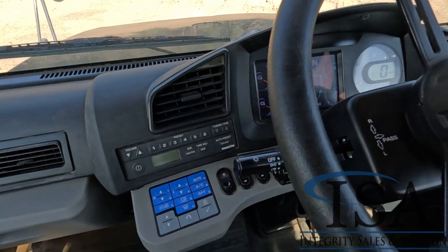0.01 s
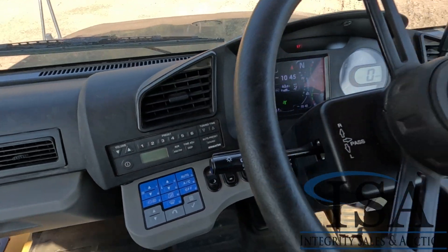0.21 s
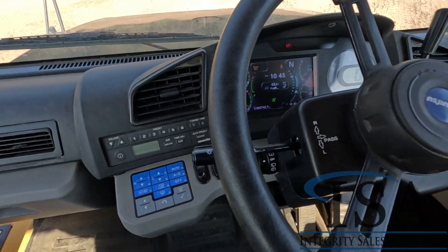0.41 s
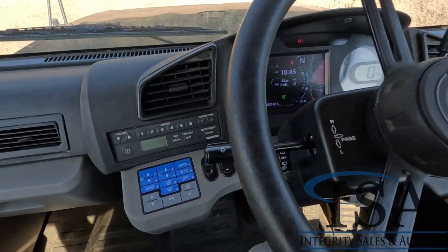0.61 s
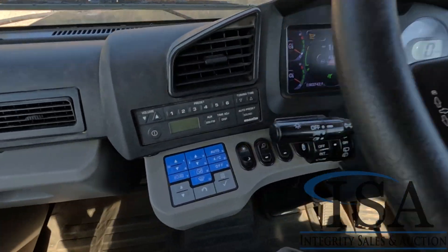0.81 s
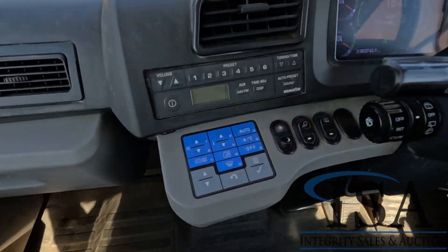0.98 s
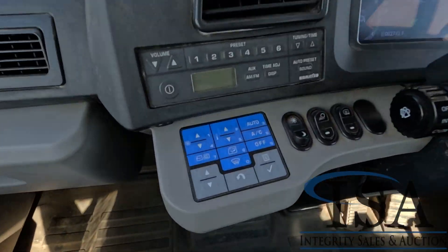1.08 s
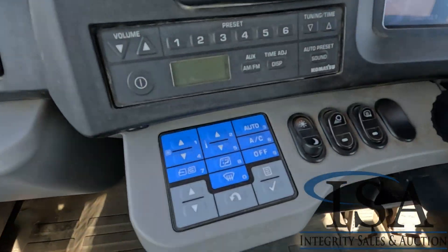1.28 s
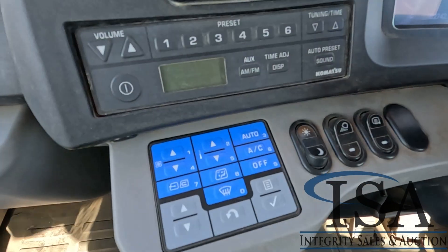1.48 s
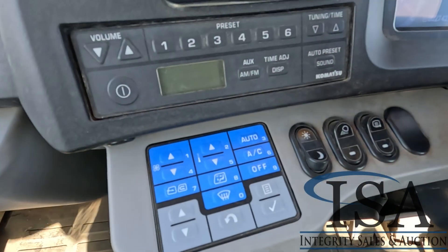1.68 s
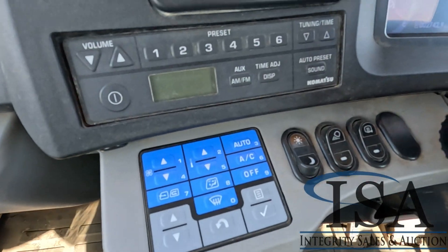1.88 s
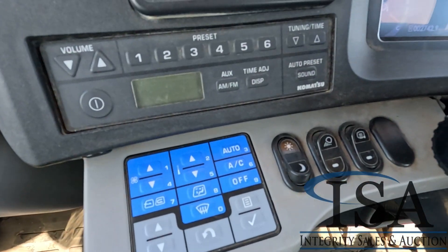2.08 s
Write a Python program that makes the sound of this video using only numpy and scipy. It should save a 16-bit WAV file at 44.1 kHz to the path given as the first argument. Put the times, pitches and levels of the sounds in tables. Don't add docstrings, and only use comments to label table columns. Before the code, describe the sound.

A heavy cab door slams at about 0.65 seconds, heard close inside a large idling diesel vehicle. Before it, engine clatter enters through the doorway. Air pressure thumps, the latch bangs, and metal panels crash and rattle until about 0.9. The engine drops to muffled low rumble with blower hum and vent hiss, while fingers knock and creak on the microphone, right side, with a faint squeak near 1.2.

```python
import sys
import numpy as np
from scipy import signal
from scipy.io import wavfile
from scipy.ndimage import uniform_filter1d

SR = 44100
rng = np.random.default_rng(int(sys.argv[2]) if len(sys.argv) > 2 else 0)


def log_audio(samples):
    frames = np.atleast_2d(samples).T
    limited = np.clip(frames, -1, 1)
    pcm = np.round(limited * 32767).astype(np.int16)
    wavfile.write(sys.argv[1], SR, pcm)


def ratio_of_db(decibels):
    return 10 ** (np.asarray(decibels, float) / 20)


N = 94815
SHUT_S = 0.654


def evened(x):
    return x / np.sqrt(np.mean(x ** 2) + 1e-20)


def read(points, hz):
    f, value = np.transpose(points)
    return np.interp(np.log(hz + 1), np.log(f + 1), value)


def curve(points):
    s, db = np.transpose(points)
    return ratio_of_db(np.interp(np.arange(N) / SR, s, db))


def left_right(left_db, right_db):
    return ratio_of_db(np.array([[left_db], [right_db]]))


def add(mix, s, sound):
    part = mix[..., round(s * SR):][..., :sound.shape[-1]]
    part += sound[..., :part.shape[-1]]


def noise(tone, same, lean, patchy_db, size=1024, pipes=()):
    hop = size // 4
    hz = np.fft.rfftfreq(size, 1 / SR)
    a, b, c, d, patch = rng.standard_normal((N // hop + 5, len(hz), 5)).T
    patch = uniform_filter1d(uniform_filter1d(patch, size=8, axis=0), size=8, axis=1)
    like = np.clip(read(same, hz), -1, 1)[:, None]
    left = a + 1j * b
    right = like * left + np.sqrt(1 - like ** 2) * (c + 1j * d)
    side = read(lean, hz)[:, None] / 2
    resonance = sum(db * np.exp(-((hz - f) / width) ** 2) for f, width, db in pipes)
    colour_db = (read(tone, hz) + resonance)[:, None] + patchy_db * evened(patch)
    z = np.array([left, right]) * ratio_of_db(colour_db + np.array([side, -side]))
    return evened(signal.istft(z, nperseg=size, noverlap=size - hop)[1][:, :N])


def bursts(rows):
    out = np.zeros(N)
    for s, db, rise, t60 in rows:
        t = np.arange(0, rise + 1.5 * t60, 1 / SR)
        fall_db = 60 * np.maximum(t - rise, 0) / t60
        add(out, s, np.minimum(t / rise, 1) * ratio_of_db(db - fall_db))
    return out


def ring(db, hz, t60, soft=0.0011):
    t = np.arange(0, t60, 1 / SR)
    return (1 - np.exp(-t / soft)) ** 2 * ratio_of_db(db - 60 * t / t60) * np.sin(2 * np.pi * hz * t)


def rasp(sound, hz):
    cycles, full_hz = 8, 3500
    flutter = rng.standard_normal((2, len(sound)))
    flutter = evened(uniform_filter1d(flutter, size=int(cycles * SR / hz) + 1))
    share = np.clip(hz / full_hz, 0, 0.9)
    return sound * (np.sqrt(1 - share ** 2) + share * flutter)


def duck():
    down_db, hold_s, back_s = -8.5, 1.06, 0.21
    return curve([(0, 0), (SHUT_S, 0), (SHUT_S + 0.11, down_db), (hold_s, down_db), (hold_s + back_s, 0)])


# multiple of the blower pitch, level_db
BLOWER_LINES = [(3, -70.5), (4, -43.5), (6, -46), (9, -56), (12.5, -67), (14.35, -64.5)]
# pitch_hz, level_db per Hz
VENT_COLOUR = [(300, -28), (550, -1.5), (1400, -8), (2200, -17), (2750, -19.5), (4100, -24.5), (9000, -41),
               (11500, -100)]
# pitch_hz, width_hz, level_db
VENT_PIPES = [(1970, 190, 3.5), (2667, 370, 6), (3840, 500, 5.3)]
# time_s, level_db
VENT_NEARNESS = [(0, -4), (1.0, -9), (1.3, -6), (1.7, -4.5), (2.15, 0.5)]
# pitch_hz, likeness 0 to 1
CAB_LIKENESS = [(30, 0.93), (150, 1), (1000, 0.94), (3000, 0.9), (8000, 0.87)]
# pitch_hz, level_db
CAB_LEAN = [(100, 0.298), (1000, .3), (8000, 1.5)]


def blower():
    blower_hz, waver_db, vent_db = 56.73, 1.7, -49
    t = np.arange(N) / SR
    lines = np.zeros(N)
    for multiple, db in BLOWER_LINES:
        waver = waver_db * np.sin(2 * np.pi * (rng.uniform(1.0, 3.2) * t + rng.random()))
        lines += ratio_of_db(db + waver) * np.sin(2 * np.pi * (multiple * blower_hz * t + rng.random()))
    lines *= duck() * curve([(0, 0), (1.3, 0.054), (2.15, 2.3)])
    hiss = noise(VENT_COLOUR, CAB_LIKENESS, CAB_LEAN, patchy_db=1.6, pipes=VENT_PIPES)
    return lines + ratio_of_db(vent_db) * curve(VENT_NEARNESS) * hiss


# time_s, level_db
FIRING_LEVEL = [(0, -29), (.17, -27.5), (.5, -22.5), (.59, -21), (.63, -33), (1.08, -37.5), (1.22, -42),
                (1.29, -48), (1.35, -29.5), (1.4, -37), (1.45, -31.5), (1.58, -29), (1.65, -33.5),
                (1.7, -27.5), (1.79, -35.5), (1.97, -38.5), (2.07, -31), (2.15, -30)]
# multiple, level_db
FIRING_ORDERS = [(1, 0.5), (2, -16.5), (3, -21.5), (4, -46)]
# time_s, level_db
DOORWAY = [(0, -7.5), (.15, -1.5), (.45, 2.5), (.62, 1), (.68, 12.5), (.9, -29), (1.0, -32), (2.15, -57)]
# pitch_hz, level_db
WHINE = [(808, -51), (1070, -56), (1775, -62), (1850, -63)]
# pitch_hz, level_db per Hz
CLATTER_COLOUR = [(150, -31), (420, -8), (900, 1.5), (1900, -13), (3700, -17), (6600, -26), (12500, -46.5),
                  (14000, -92)]
# pitch_hz, width_hz, level_db
BAY_PIPES = [(1850, 210, 3.4), (3620, 500, 2.3)]
# pitch_hz, likeness 0 to 1
DOORWAY_LIKENESS = [(60, 0.74), (240, 0.51), (950, 0.88), (3770, 0.57), (15000, 0.97)]
# pitch_hz, level_db
DOORWAY_LEAN = [(60, 0), (380, 2), (2380, 3.5), (15000, 5)]
# pitch_hz, level_db per Hz
RUMBLE_COLOUR = [(7.1, -17), (12, -12), (38, -2), (174, -9), (194, -23), (232, -16), (304, -15.5),
                 (339, -18.5), (900, -48.5), (1170, -67), (1980, -120)]


def engine():
    fire_hz, peak_s, wander_s, uneven_db = 35.6, 0.277, 0.0014, 2.6
    clatter_db, clatter_pulse, rumble_db = -44.5, 0.1, -34
    sway_db, sway_s = -24, 0.009
    t = np.arange(N) / SR
    since = t - peak_s
    turn = 2 * np.pi * fire_hz * (since + wander_s * np.sin(2 * np.pi * 0.576 * since) ** 2)
    tone = np.sqrt(2) * curve(FIRING_LEVEL) * sum(ratio_of_db(db) * np.cos(k * turn) for k, db in FIRING_ORDERS)

    clatter = noise(CLATTER_COLOUR, DOORWAY_LIKENESS, DOORWAY_LEAN, patchy_db=2.1, pipes=BAY_PIPES)
    clatter *= 1 + clatter_pulse * np.cos(turn - 1.2)
    rumble = noise(RUMBLE_COLOUR, CAB_LIKENESS, CAB_LEAN, patchy_db=3.0, size=2048)
    vibrato = 0.13 * np.sin(2 * np.pi * 2.8 * t)
    whine = sum(ratio_of_db(db) * np.sin(2 * np.pi * (hz * t + vibrato)) for hz, db in WHINE)

    strength = np.interp(turn / (2 * np.pi) + 12, np.arange(100), rng.standard_normal(100))
    firing = tone * ratio_of_db(uneven_db * strength)
    sway = ratio_of_db(sway_db) * np.exp(-(t / sway_s) ** 2)
    through_door = curve(DOORWAY) * (whine + ratio_of_db(clatter_db) * clatter)
    return firing + sway + through_door + ratio_of_db(rumble_db) * duck() * rumble


# start_s, level_db
KNOCKS = [(0.715, -27), (0.992, -35.5), (1.099, -35.5), (1.116, -37), (1.188, -36), (1.218, -25),
          (1.227, -19), (1.235, -22.5), (1.258, -31.5), (1.268, -28), (1.288, -25.5), (1.327, -30),
          (1.374, -28.5), (1.392, -34.5), (1.406, -31.5), (1.454, -34.5), (1.484, -31), (1.528, -21.5),
          (1.555, -27.5), (1.564, -27), (1.603, -25.5), (1.622, -33.5), (1.696, -35), (1.726, -32),
          (1.794, -27), (1.837, -26.5), (1.866, -29), (1.958, -31), (1.997, -33), (2.046, -37), (1.24, -28),
          (1.51, -28.5), (1.614, -31), (1.656, -38), (1.684, -35), (1.925, -34), (2.085, -39), (1.297, -28),
          (1.89, -34)]
# pitch_hz, level_db, t60_s, left_port_db
CASE_MODES = [(106.2, -3, 0.058, -8.5), (211.7, 0, 0.054, -13.5), (336.3, 0.5, 0.035, -18),
              (526, 1, 0.022, -16), (815, -5.5, 0.016, -10.5), (1060, -10.5, 0.011, -16.5)]
# start_s, level_db, pitch_hz, t60_s
SNAPS = [(1.227, -25.5, 883, 0.026), (1.228, -33, 1200, .02), (1.288, -25.5, 598, 0.051),
         (1.3, -27, 266, .12), (1.529, -27, 953, 0.028), (1.53, -26, 597, 0.043),
         (1.837, -32.5, 1146, 0.019)]
# start_s, level_db, rise_s, t60_s
SQUEAKS = [
    (1.224, -54, 0.006, 0.07),
    (1.234, -57.5, .003, 0.06),
]
# pitch_hz, level_db
SQUEAK_COLOUR = [(2500, -48), (3400, -1.5), (3900, -2), (4400, -12), (5200, -14), (8000, -21), (9500, -33)]


def grip():
    snap_left_db, knock_db, stutter_s = -11.5, 5, 0.00705
    tune_spread, soft_s = 0.16, 0.0016
    dulling = 0.19
    out = noise(SQUEAK_COLOUR, SLAM_LIKENESS, CAB_LEAN, patchy_db=-3.0, size=256) * bursts(SQUEAKS)
    for s, db, hz, t60 in SNAPS:
        add(out, s, left_right(snap_left_db, 0) * ring(db, hz, t60))
    luck = rng.uniform(-1, 1, (len(KNOCKS), 2, len(CASE_MODES), 3))
    for (s, level_db), slips in zip(KNOCKS, luck):
        weakness_db = dulling * min(level_db + 26.5, 0)
        for j, slip in enumerate(slips):
            for (hz, db, t60, left_db), (size, tune, way) in zip(CASE_MODES, slip):
                slip_db = level_db + knock_db + db + 1.5 * size
                slip_db += weakness_db * np.log2(hz / 200) - 6.8 * j
                mode = ring(slip_db, hz * (1 + tune_spread * tune), t60, soft=soft_s)
                add(out, s + j * stutter_s, left_right(left_db, 0) * np.sign(way) * mode)
    return out


# start_s, level_db, pitch_hz, t60_s, push 1 or pull -1
BOUNCES = [(.66, -14.8, 26, .96, -1), (.685, 1.8, 19.2, .15, -1), (.713, -7.2, 16.2, .34, 1),
           (.8343, -21.5, 25.7, 1.2, 1), (.8856, -24, 34.5, 1.6, 1)]
# start_s, level_db, pitch_hz, t60_s
THUMPS = [(.681, -4.5, 117, 0.046), (0.717, -23, 95.5, 0.26), (0.83, -34, 130, 0.14),
          (0.72, -23.5, 131.2, 0.39), (0.806, -19, 77, 0.068), (.862, -16, 77, 0.086),
          (.89, -24.5, 92, 0.5), (0.885, -25, 133, 0.54), (.706, -13.5, 150, .025), (1.345, -27, 58, 0.12),
          (1.606, -23, 70, .1), (1.72, -29.5, 118, 0.27), (1.3, -30.5, 72, .3), (.42, -29, 123, .2),
          (.76, -21.5, 68, 0.16), (0.85, -31.5, 223.4, 0.14), (1.0, -26.5, 110, 0.15),
          (1.838, -27.5, 88.6, 0.68)]
# start_s, level_db, rise_s, t60_s, treble_db
CRASHES = [(.652, -27, 0.028, 0.13, 3), (.673, -20, 0.001, 0.3, 0), (0.683, -18, 0.0022, 0.044, 2.5),
           (.7125, -16.5, 0.00042, 0.15, -5.5), (0.74, -22, 0.0022, 0.073, 4),
           (0.7744, -19, 0.0009, 0.11, 1.5), (0.811, -25, 0.0074, 0.086, -6.5),
           (.835, -27, 0.0021, 0.11, -2.5), (.849, -29.5, 0.003, 0.085, -3.5),
           (0.871, -38, .006, 0.39, -8.5)]
# time_s, level_db, width_s
HUSHES = [(0.709, -8.5, 0.0033), (.738, -2.5, 0.0033), (0.774, -3, 0.0044)]
# pitch_hz, level_db
SLAM_COLOUR = [(70, -41.5), (200, 1.5), (550, -5.5), (1500, -14), (3400, -19), (7600, -25), (12000, -44),
               (15500, -69.5)]
# pitch_hz, likeness 0 to 1
SLAM_LIKENESS = [(60, 0.95), (240, 0.99), (950, 0.82), (3770, 0.3), (8000, .85), (13000, 0.45)]
# pitch_hz, level_db
SLAM_LEAN = [(60, 1), (240, 1.0), (950, 1.0), (3770, 3.5), (8000, 2.7), (13000, 6.5)]
# start_s, level_db, pitch_hz, t60_s
CLANGS = [(.713, -20, 524, 0.13), (.738, -16.5, 244.6, 0.073), (.745, -28, 1396, 0.13),
          (.777, -24, 2790, 0.062), (.778, -21.5, 576, 0.098), (.783, -22.5, 380, 0.099),
          (.685, -21, 7280, 0.072), (.685, -35, 4740, .08), (.686, -25.5, 3450, 0.096),
          (.714, -26, 3340, .14), (.714, -28.5, 2010, 0.13), (.743, -27, 2186, .04),
          (.743, -31, 5130, 0.086), (.778, -31.5, 3426, .1), (.778, -35, 6760, .1), (.885, -31, 347, 0.13)]
# start_s, level_db, rise_s, t60_s
TICKS = [
    (.22, -45, 0.0052, 0.08),
    (.955, -63, 0.0015, 0.059),
    (1.04, -60.5, 0.0031, 0.065),
    (1.436, -58, 0.0015, 0.026),
]
# pitch_hz, level_db
TICK_COLOUR = [(800, -26), (1500, -10), (2500, -0.5), (4000, 3.5), (7000, -5.5), (9500, -9.5), (12500, -22),
               (14500, -33)]


def door():
    squeeze_s, air_db, air_hz, air_t60 = 0.085, -9, 21.5, 0.69
    split_hz, body_lag = 2120, 1.775
    crackle_db, crackle_s, clang_lean_db = 1.5, 0.00036, 1.5
    t = np.arange(N) / SR
    since = t - SHUT_S
    after = np.maximum(since, 0)
    squeeze = np.sin(np.pi / 2 * np.clip(1 + since / squeeze_s, 0, 1)) ** 1.5
    air = squeeze * ratio_of_db(air_db - 60 * after / air_t60) * np.cos(2 * np.pi * air_hz * after)
    for s, db, hz, t60, way in BOUNCES:
        add(air, s, way * ring(db, hz, t60, soft=0.0003))
    for s, db, hz, t60 in THUMPS:
        add(air, s, ring(db, hz, t60))

    crash = noise(SLAM_COLOUR, SLAM_LIKENESS, SLAM_LEAN, patchy_db=0.0, size=256)
    low = signal.sosfiltfilt(signal.butter(2, split_hz, fs=SR, output="sos"), crash)
    body = bursts([(s, db - 5.0, rise, body_lag * t60) for s, db, rise, t60, _ in CRASHES])
    treble = bursts([(s, db + treble_db, rise, t60) for s, db, rise, t60, treble_db in CRASHES])
    grit = evened(uniform_filter1d(rng.standard_normal(N), round(crackle_s * SR)))
    crackle = evened(ratio_of_db(crackle_db * grit))
    hit = low * body + (crash - low) * crackle * treble
    hit *= ratio_of_db(sum(db * np.exp(-((t - s) / width) ** 2) for s, db, width in HUSHES))

    ticks = noise(TICK_COLOUR, SLAM_LIKENESS, SLAM_LEAN, patchy_db=2.5, size=256) * bursts(TICKS)
    for k, (s, db, hz, t60) in enumerate(CLANGS):
        clang = rasp(ring(db, hz, t60, soft=0.4 / hz + 0.00027), hz)
        lean_db = clang_lean_db * (-1) ** k
        add(hit, s, clang * left_right(lean_db / 2, -lean_db / 2))
    return air + hit + ticks


def scene():
    return blower() + engine() + grip() + door()


def low_pass(x):
    return signal.sosfilt(signal.butter(12, 15640, fs=SR, output="sos"), x)


def record(dry):
    ports = dry * left_right(0.01, -0.01)
    band_limit = signal.firwin(511, 15500, window=("kaiser", 9), fs=SR)
    finished = signal.oaconvolve(ports, band_limit[None], "same")
    return low_pass(finished)


dry = scene()
out = record(dry)
log_audio(out)
```